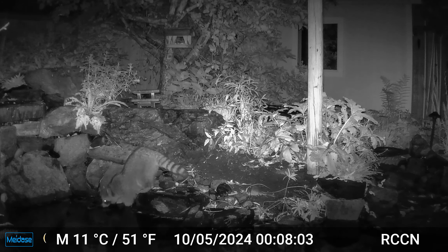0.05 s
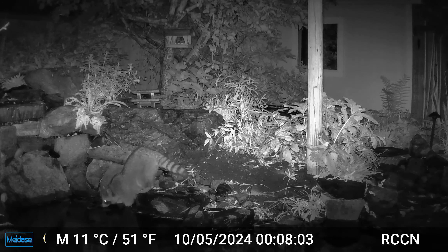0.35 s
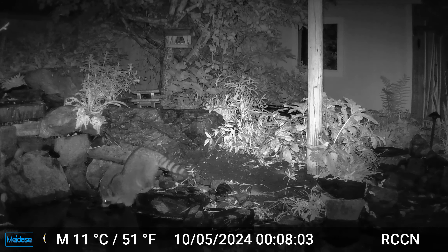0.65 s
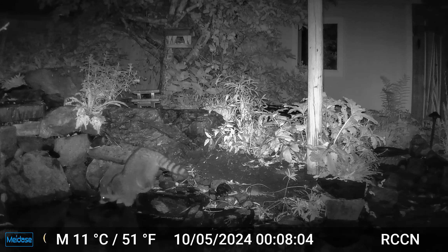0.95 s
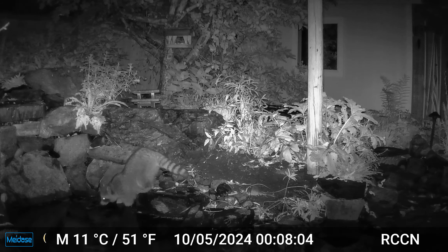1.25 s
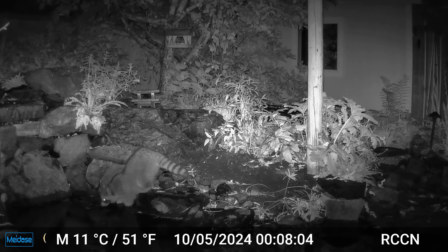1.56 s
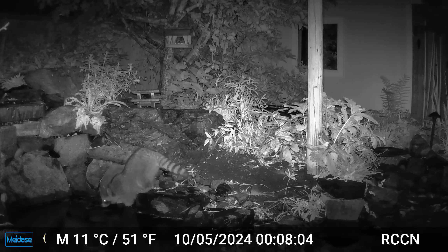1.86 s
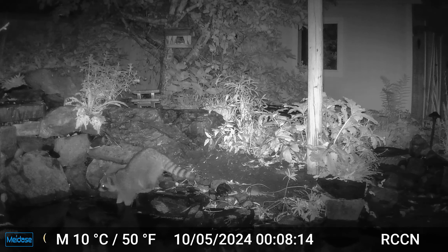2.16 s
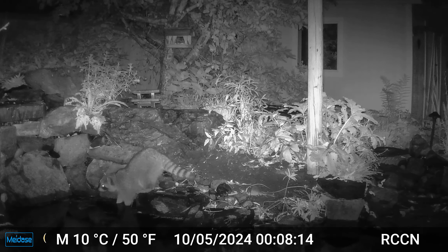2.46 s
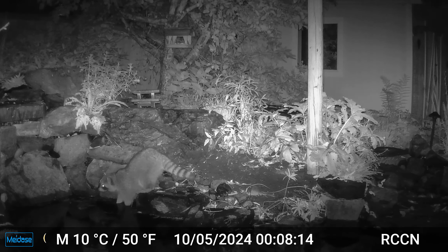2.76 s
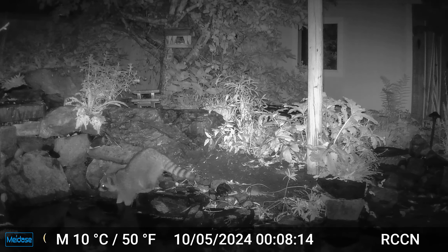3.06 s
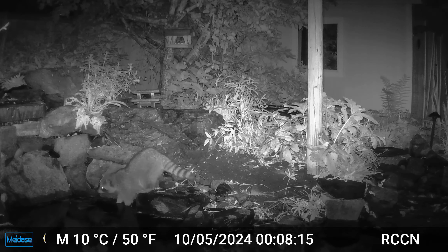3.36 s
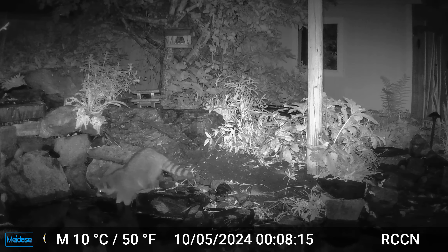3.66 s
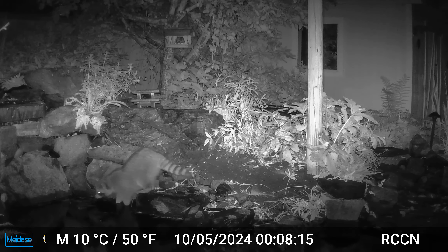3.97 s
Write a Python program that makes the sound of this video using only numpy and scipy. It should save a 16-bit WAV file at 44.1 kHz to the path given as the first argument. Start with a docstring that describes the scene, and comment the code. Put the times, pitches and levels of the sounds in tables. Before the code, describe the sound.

A raccoon dabbles in a pond with small splashes, plops and drips over steady hiss.

```python
"""A garden pond at night: distant rumble, a low hum, night air and microphone hiss throughout.
A raccoon dabbles at the rocky edge: spray splashes, air pockets plop under its paws, water sloshes
in the hollows, drips ring as bubbles. Rocks and a house wall answer briefly.
At 2.24 s the sound cuts out for a moment; the hiss comes back louder and settles.
The animal is then nearly still, with one faint splash near the end."""
import sys
import numpy as np
from scipy import signal
from scipy.fft import rfft, irfft, next_fast_len
from scipy.io import wavfile
from scipy.ndimage import map_coordinates

SR = 44100
rng = np.random.default_rng(int(sys.argv[2]) if len(sys.argv) > 2 else 0)


def digitize_waveform(pressure):
    """Quantize a signal to 16-bit integers and store it at the path in sys.argv[1].

    Rows of a 2-D input are taken as channels; values are limited to [-1, 1].
    """
    field = np.atleast_2d(pressure).T
    bounded = np.clip(field, -1, 1)
    quanta = np.round(bounded * 32767).astype(np.int16)
    wavfile.write(sys.argv[1], SR, quanta)


N = 176400
TOP_HZ = 9100


def amp(db):
    """Decibels to gain."""
    return 10 ** (np.asarray(db) / 20)


def unit(x):
    """Scale to rms 1."""
    return x / np.sqrt(np.mean(x ** 2) + 1e-20)


def along(points, hz):
    """Interpolate (freq_hz, value) points on a log axis."""
    freqs, values = np.transpose(points)
    return np.interp(np.log(hz + 1), np.log(freqs + 1), values)


def wobble(knots_per_s):
    """Smooth random curve."""
    return map_coordinates(rng.standard_normal(400), [np.arange(N) * knots_per_s / SR], mode="mirror")


def filtered(x, response):
    """Apply response(hz) to x."""
    size = next_fast_len(len(x) + 8192)
    return irfft(rfft(x, size) * response(np.fft.rfftfreq(size, 1 / SR)), size)[:len(x)]


def noise(spectrum):
    """Coloured noise, rms 1."""
    return unit(filtered(rng.standard_normal(N), lambda hz: amp(along(spectrum, hz))))


def hump(hz, centre_hz, octaves):
    """Bell on the log-frequency axis."""
    return np.exp(-.5 * (np.log2((hz + 1) / centre_hz) / octaves) ** 2)


def event_time():
    """Time axis of one event, 0.2 s."""
    return np.arange(SR // 5) / SR


def at_level(x, level_db, length_s):
    """Scale x to the energy of level_db held for length_s."""
    return amp(level_db) * x * np.sqrt(length_s * SR / (np.sum(x ** 2) + 1e-20))


def add(out, start_s, x):
    """Mix x into out."""
    part = out[round(start_s * SR):][:len(x)]
    part += x[:len(part)]


# rumble, air and hiss spectra: freq_hz, relative_db
RUMBLE_SPECTRUM = [(12, -28), (28, -11), (52, 3.5), (78, -3.5), (118, -1), (165, -17), (260, -19.5),
                   (600, -54)]
AIR_SPECTRUM = [(60, -14), (200, -0.5), (370, -1), (720, -3), (1100, -7.5), (1800, -17.5), (4000, -25)]
HISS_SPECTRUM = [(200, -10), (1200, 4), (2800, 2), (3800, 3.5), (5500, -0.5), (7400, -2), (8400, -16)]
# hum tones: pitch_hz, base_level_db
HUM_TONES = [(97, -59.5), (366, -72)]
# background levels: time_s, rumble_db, air_and_hiss_boost_db
BACKGROUND_LEVELS = [(0, -51, 3.5), (0.699, -55.5, 3.5), (1.402, -51, 4), (2.202, -51, 4), (2.309, -45, 10),
                     (2.62, -43.5, 7.5), (2.78, -46.5, 3), (3.15, -48, 2), (3.7, -52, 2),
                     (3.87, -43.5, 2.5), (4, -45, 3.5)]


def background(air_base_db=-61, hiss_base_db=-66, waver_db=4.5, drift_rad=0.5):
    """Distant rumble, a wavering hum that follows its level, night air and microphone hiss."""
    t = np.arange(N) / SR
    time_s, rumble_db, boost_db = np.transpose(BACKGROUND_LEVELS)
    rumble_db, boost_db = np.interp(t, time_s, rumble_db), np.interp(t, time_s, boost_db)
    hum = np.zeros(N)
    for pitch_hz, base_level_db in HUM_TONES:
        gain = np.sqrt(2) * amp(base_level_db + waver_db * wobble(7))
        hum += gain * np.sin(2 * np.pi * pitch_hz * t + drift_rad * wobble(11))
    hum *= amp(rumble_db - rumble_db.mean())
    rumble = amp(rumble_db) * noise(RUMBLE_SPECTRUM)
    air = amp(air_base_db + 1.3 * wobble(11)) * noise(AIR_SPECTRUM)
    hiss = amp(hiss_base_db) * noise(HISS_SPECTRUM)
    return rumble + hum + amp(boost_db) * (air + hiss)


# fine spray: start_s, level_db, length_s, centre_hz, width_octaves
SPLASHES = [(0.115, -47, 0.0026, 3950, 0.46), (0.322, -55.5, 0.0054, 3000, 0.88),
            (.3805, -48.5, 0.005, 7060, 0.48), (0.537, -54.5, 0.027, 6150, 0.74),
            (0.556, -48.5, 0.0081, 3130, 1), (0.888, -48.5, 0.006, 5940, 0.61),
            (0.897, -41.5, 0.0066, 4280, 0.85), (0.9064, -45, 0.004, 3940, 0.47),
            (0.9117, -34, 0.0073, 4070, 1), (0.944, -49.5, 0.033, 3730, 0.1),
            (0.951, -48, 0.013, 6700, 0.71), (1.110, -47, 0.023, 5280, 0.21),
            (1.143, -43.5, 0.0053, 5480, 0.4), (1.148, -35.5, 0.02, 7600, 0.2),
            (1.224, -53, 0.05, 7100, 0.21), (1.26, -39.5, 0.0065, 4870, 0.65),
            (1.263, -49.5, 0.022, 6550, 0.32), (1.438, -43, 0.0091, 7740, 0.081),
            (1.606, -51, 0.016, 2530, 0.55), (1.711, -53.5, 0.0073, 6150, 0.41),
            (1.803, -57, 0.022, 7760, 0.13), (1.823, -51, 0.026, 4640, 0.27), (1.8836, -37, 0.01, 3720, .7),
            (1.9036, -36.5, 0.013, 4320, 0.777), (1.929, -51, 0.025, 5500, 0.86),
            (3.806, -61.5, 0.025, 5300, 0.25)]


def splash(level_db, length_s, centre_hz, width_octaves, bubbles_per_s=1800, t60_cycles=36):
    """A fast-swelling burst of tiny bubbles over a fizz of spray."""
    t = event_time()
    max_bubbles = 96
    onset = rng.random(max_bubbles)
    spread = rng.standard_normal(max_bubbles)
    size = rng.exponential(size=max_bubbles)
    pitch_hz = np.clip(centre_hz * 2 ** (width_octaves * spread), 700, TOP_HZ)[:, None]
    age_s = np.maximum(t[:SR // 16] - (length_s * onset ** 1.6)[:, None], 0)
    active = np.arange(max_bubbles) < bubbles_per_s * length_s
    gain = amp(3.86 * size - 11 * onset) * np.sqrt(pitch_hz[:, 0]) * active
    rings = amp(-60 * age_s * pitch_hz / t60_cycles) * np.sin(2 * np.pi * pitch_hz * age_s)
    bubbles = np.pad(gain @ rings, (0, len(t) - rings.shape[1]))
    fizz = rng.standard_normal(len(t)) * np.exp(-t / (0.73 * length_s))
    fizz = filtered(fizz, lambda hz: hump(hz, centre_hz, width_octaves) * (hz < TOP_HZ))
    swell = 1 - np.exp(-t / (0.13 * length_s))
    spray = swell * (unit(bubbles) + 0.5 * unit(fizz))
    gap = lambda hz: 1 - 0.38 * hump(hz, 2770, octaves=0.18)  # thin between large and small bubbles
    spray = filtered(spray, lambda hz: hump(hz, centre_hz, 2 * width_octaves) * gap(hz))
    return at_level(spray, level_db, length_s)


# paw pushes: start_s, pitch_hz, level_db, length_s
PLOPS = [(0.1167, 486, -35, 0.0075), (0.324, 496, -36.5, 0.01), (0.542, 530, -34.5, 0.0077),
         (.551, 526, -31.5, 0.008), (.723, 770, -46, 0.027), (.724, 1480, -46.5, .032),
         (0.74, 845, -42.5, .024), (0.889, 564, -28, 0.0084), (0.945, 420, -29, 0.0037),
         (0.9473, 389, -30.5, 0.016), (1.054, 379, -27.5, 0.013), (1.057, 123, -26.5, 0.018),
         (1.093, 446, -33.5, 0.0086), (1.144, 420, -34.5, 0.0055), (1.186, 382, -34, 0.019),
         (1.509, 373, -40, 0.018), (1.612, 416, -38, 0.018), (1.635, 520, -32, 0.011),
         (1.673, 545, -42, 0.014), (1.753, 102.7, -34, 0.044), (1.764, 396, -46, 0.046),
         (2.053, 375, -40.5, 0.024)]


def plop(pitch_hz, level_db, length_s, sag_share=0.033, ragged_rad=0.25):
    """An air pocket under the paw pulses unevenly, sags in pitch and dies quickly."""
    t = event_time()
    progress = t / length_s
    swell = (progress / 0.24 * np.exp(1 - progress / 0.24)) ** 1.49
    jitter = ragged_rad * map_coordinates(rng.standard_normal(len(t)), [t * pitch_hz / 2])
    glide_hz = pitch_hz * (1 + sag_share * (.4 - np.minimum(progress, 1)))
    return amp(level_db) * swell * np.sin(2 * np.pi * np.cumsum(glide_hz) / SR + jitter)


# rock hollow resonances: pitch_hz, width_hz, gain_db
HOLLOWS = [(370, 173, 6), (523, 150, 0.5), (826, 180, 1), (1164, 140, 1), (1582, 137, 2), (2250, 410, -3)]
# water in the hollows: start_s, level_db, length_s, centre_hz
SLOSHES = [(0.117, -52, 0.022, 950), (0.207, -50.5, 0.017, 547), (0.32, -46.5, 0.013, 1240),
           (0.378, -49.5, 0.019, 1260), (0.5, -51, 0.032, 730), (0.535, -48.5, 0.022, 1300),
           (.912, -40.5, 0.0094, 1000), (0.947, -41, 0.012, 840), (1.0932, -41, 0.013, 680),
           (1.104, -43.5, 0.014, 800), (1.262, -43, 0.016, 1480), (1.281, -43, 0.012, 980),
           (1.635, -43.5, 0.01, 800), (1.879, -46.5, 0.017, 1900), (1.904, -38.5, 0.011, 1950),
           (1.98, -47.5, 0.0089, 1000)]


def slosh(level_db, length_s, centre_hz, width_octaves=0.65, retune_share=0.021):
    """Uneven slaps ring the hollows between the rocks; the moving water retunes them for each slosh."""
    def hollows(hz):
        return sum(amp(gain_db) * (1j * hz * width_hz / (pitch_hz ** 2 - hz ** 2 + 1j * hz * width_hz)) ** 2
                   for pitch_hz, width_hz, gain_db in HOLLOWS)

    t = event_time()
    slaps = rng.standard_normal(len(t)) * np.exp(1.18 * rng.standard_normal(len(t)))
    slaps *= np.exp(-(t / (0.79 * length_s)) ** 2)
    retune = 1 + retune_share * rng.standard_normal()
    ringing = filtered(slaps, lambda hz: hollows(hz * retune) * hump(hz, centre_hz, width_octaves))
    return at_level(ringing, level_db, length_s)


# drops, one bubble each: start_s, pitch_hz, level_db, t60_s
DRIPS = [(0.1182, 4140, -30.5, 0.0067), (0.3075, 3500, -30, 0.012), (.3234, 3520, -38.5, 0.018),
         (0.4999, 3740, -28, 0.011), (.9155, 3410, -23.5, 0.0072), (1.0793, 1960, -39.5, 0.038),
         (1.1102, 4950, -39, 0.016), (1.1485, 6890, -28.5, 0.016), (1.261, 3400, -35, 0.014),
         (1.329, 1940, -22.5, 0.041), (1.329, 5280, -47.5, 0.042), (1.440, 1704, -42.5, 0.044),
         (1.5228, 3750, -36, 0.011), (1.531, 4450, -37, 0.018), (1.606, 1400, -44.5, 0.021),
         (1.678, 1100, -41.5, 0.04), (1.8305, 3430, -33, 0.016), (1.8397, 4870, -33, .004),
         (1.874, 1465, -36, 0.034), (1.8796, 4700, -22, 0.0074), (1.885, 3580, -26, 0.015),
         (1.907, 3600, -29.5, 0.016), (1.947, 1055, -39, 0.03), (2.054, 5120, -36.5, 0.015),
         (2.0757, 1453, -37, 0.025), (2.1648, 2160, -37, 0.012), (2.308, 4180, -49.5, 0.05)]


def drip(pitch_hz, level_db, t60_s, rise_s=0.013, spatter_s=0.005, attack_cycles=0.5):
    """A drop spatters and traps a ringing bubble, whose pitch climbs as it nears the surface."""
    t = event_time()
    small_bubble_hz = 2780  # bubbles above this climb less
    rise_share = 0.38 * min(1, small_bubble_hz / pitch_hz) ** 2
    glide_hz = pitch_hz * (1 + rise_share * (1 - np.exp(-t / rise_s)))
    ring = amp(-60 * t / t60_s) * np.sin(2 * np.pi * np.cumsum(glide_hz) / SR)
    spatter = unit(filtered(rng.standard_normal(len(t)), lambda hz: hump(hz, pitch_hz, octaves=0.16)))
    spatter *= amp(-23.5) * min(2, pitch_hz / small_bubble_hz) ** 2 * np.exp(-t / spatter_s)
    attack = 1 - np.exp(-t * pitch_hz / attack_cycles)
    return amp(level_db) * attack * (ring + spatter)


def trickle(drops_per_s=17, end_s=2.7, centre_hz=3340, base_db=-57, max_drops=64):
    """Faint drops fall at random from wet fur."""
    out = np.zeros(N)
    for onset, spread, size in rng.random((max_drops, 3)):
        start_s = onset * max_drops / drops_per_s
        if start_s < end_s:
            pitch_hz = centre_hz * 2 ** (2 * spread - 1)
            add(out, start_s, drip(pitch_hz, base_db + 10 * size ** 2, t60_s=0.0098))
    return garden(out)[:N]


# rock and wall reflections: delay_s, gain_db
ECHOES = [(.00255, -13.5), (.012, -16), (.022, -24)]
# diffuse decay: freq_hz, t60_s
GARDEN_DECAY = [(200, 0.13), (2000, 0.2), (8000, .18)]


def garden(x, tail_db=-9, build_s=0.0025):
    """Early echoes off rocks and wall, plus a short diffuse tail drawn anew per call."""
    hz, t, spectrum = signal.stft(rng.standard_normal(SR // 4), SR, nperseg=256)
    decay = amp(-60 * t / along(GARDEN_DECAY, hz)[:, None])
    tail = signal.istft(spectrum * decay, SR, nperseg=256)[1]
    tail *= 1 - np.exp(-np.arange(len(tail)) / SR / build_s)
    response = amp(tail_db) * tail / np.linalg.norm(tail)
    response[0] += 1
    for delay_s, gain_db in ECHOES:
        response[round(delay_s * SR)] += amp(gain_db)
    return signal.fftconvolve(x, response / np.linalg.norm(response))


def scene():
    """Dabbling paws and dripping fur over the night background, mono."""
    dabbling = np.zeros(N)
    for source, table in (drip, DRIPS), (plop, PLOPS), (slosh, SLOSHES), (splash, SPLASHES):
        for start_s, *row in table:
            add(dabbling, start_s, garden(source(*row)))
    return (dabbling + background() + trickle())[None]


# microphone treble roll-off: freq_hz, gain_db
MIC_RESPONSE = [(7400, -3), (8000, -8), (8600, -16), (9050, -36.5)]


def record(dry):
    """A small band-limited microphone with one brief dropout."""
    off_s, on_s, floor_db = 2.236, 2.308, -41.5
    fade_out_s, fade_in_s = 0.023, 0.00095
    t = np.arange(N) / SR
    gate = np.clip(np.maximum((off_s - t) / fade_out_s, (t - on_s) / fade_in_s), 0, 1) ** 2
    gated = dry[0] * (gate + (1 - gate) * amp(floor_db))
    return filtered(gated, lambda hz: amp(along(MIC_RESPONSE, hz)) * (hz < TOP_HZ))[None]


dry = scene()
out = record(dry)
digitize_waveform(out)
```